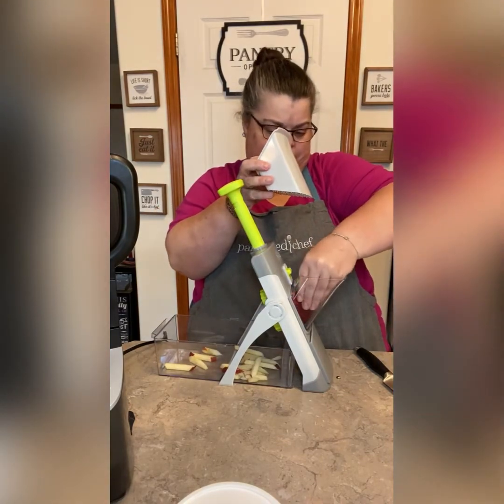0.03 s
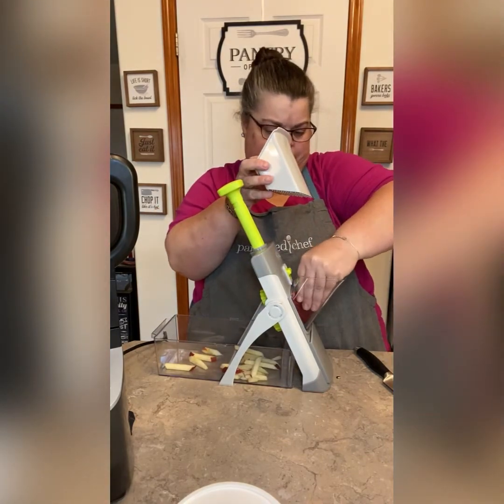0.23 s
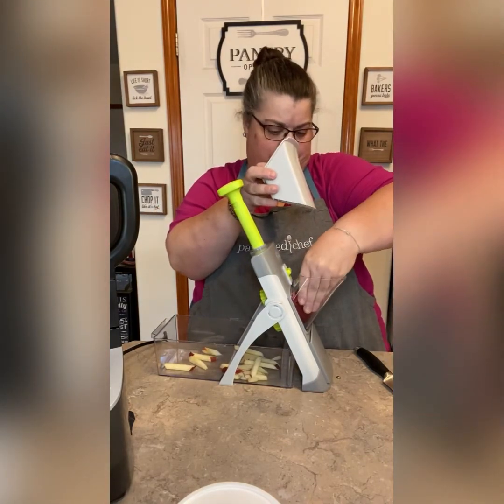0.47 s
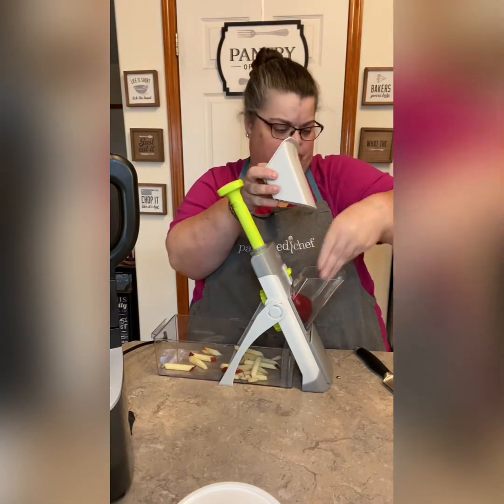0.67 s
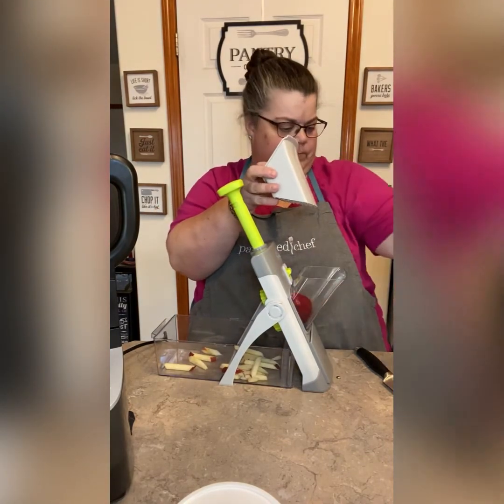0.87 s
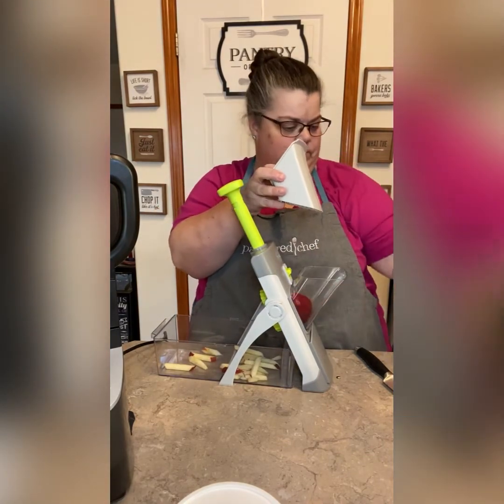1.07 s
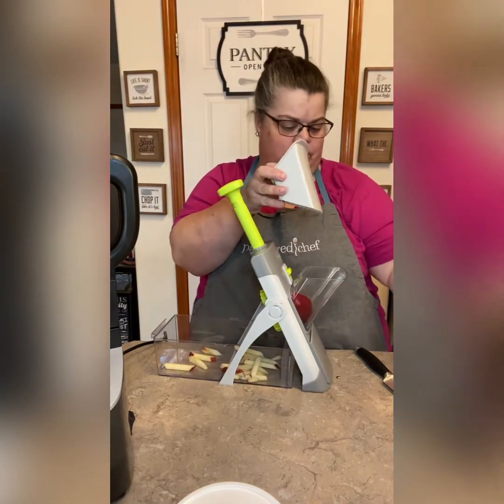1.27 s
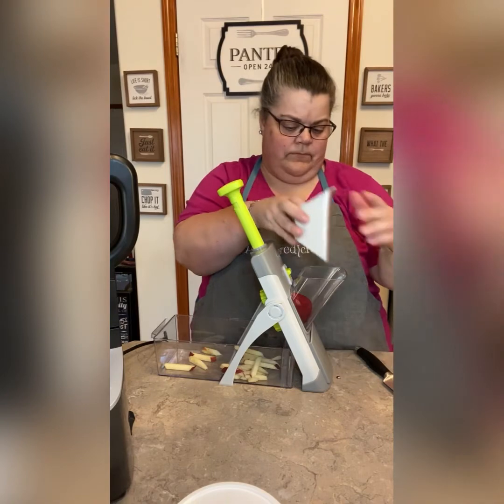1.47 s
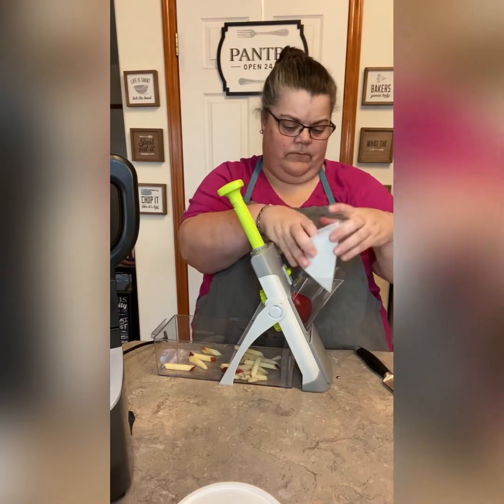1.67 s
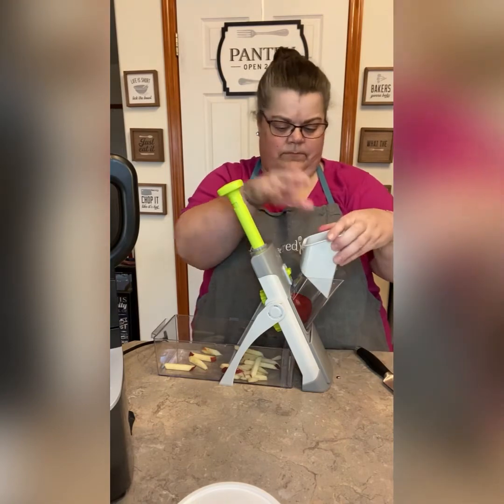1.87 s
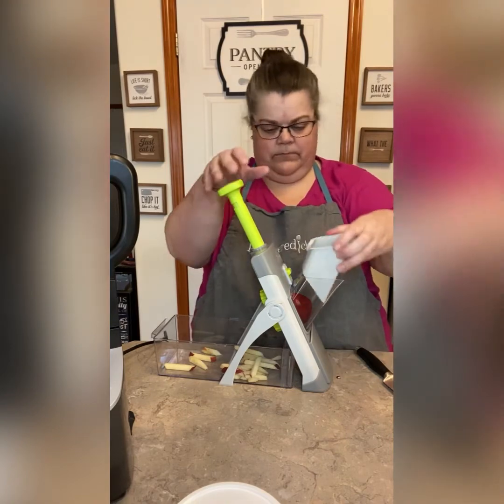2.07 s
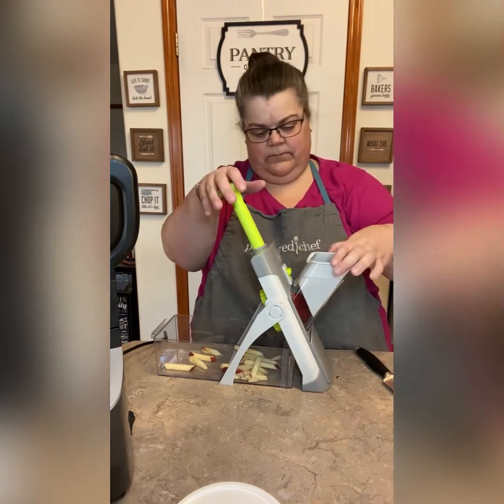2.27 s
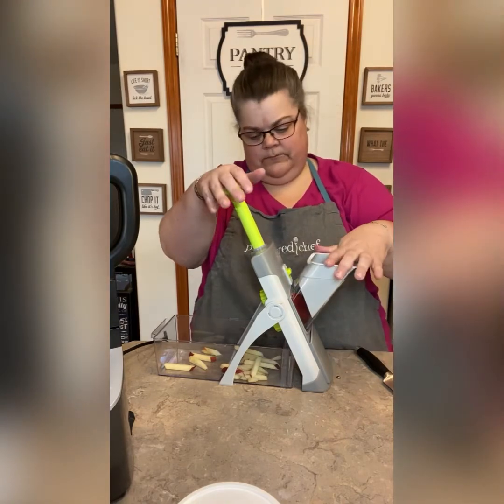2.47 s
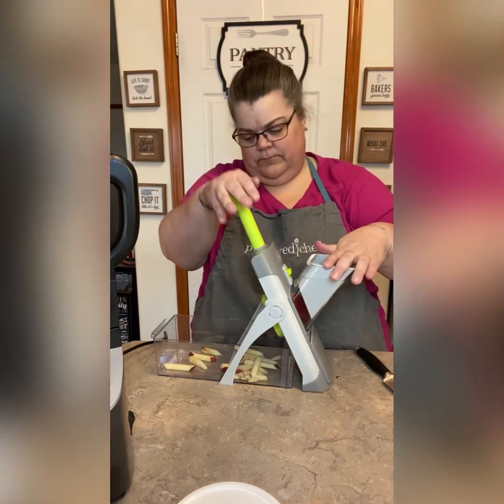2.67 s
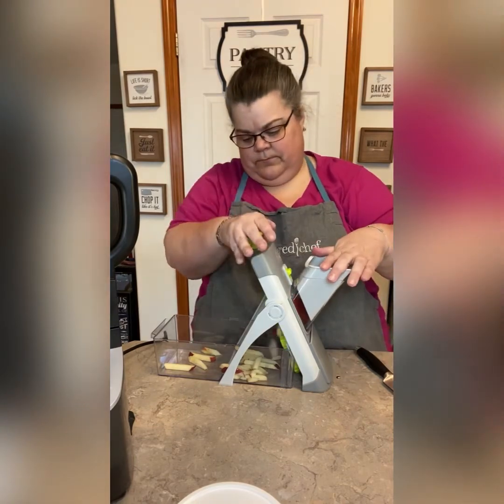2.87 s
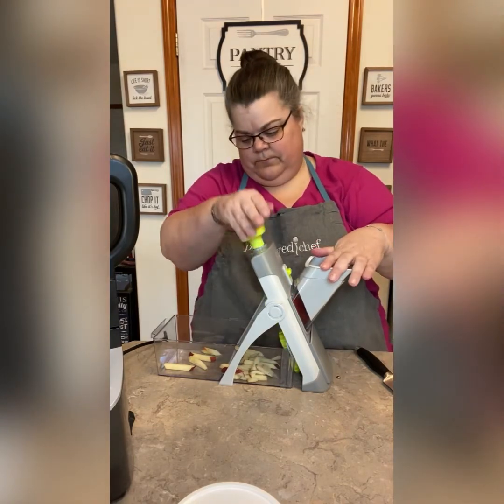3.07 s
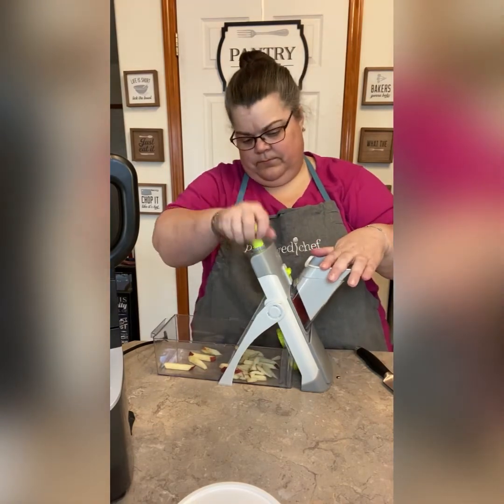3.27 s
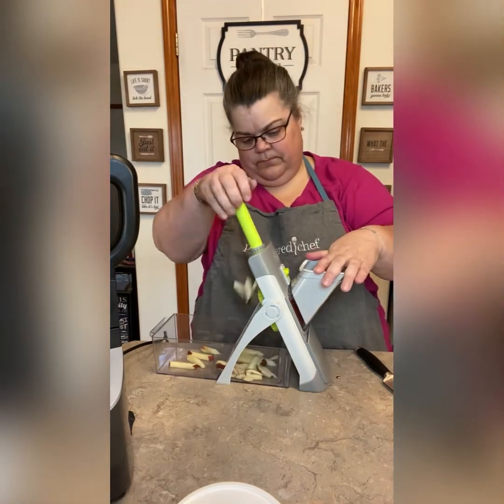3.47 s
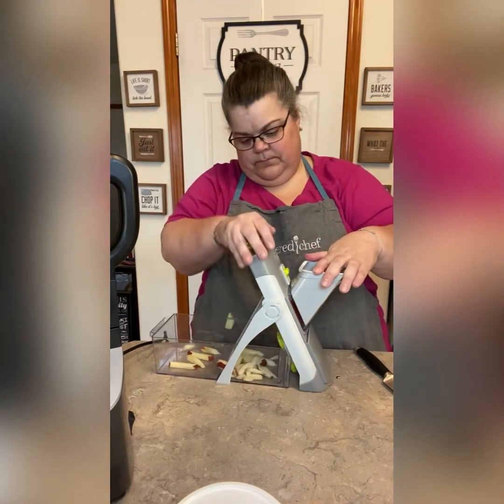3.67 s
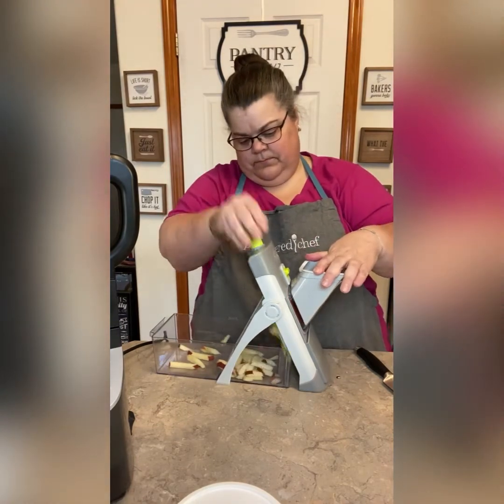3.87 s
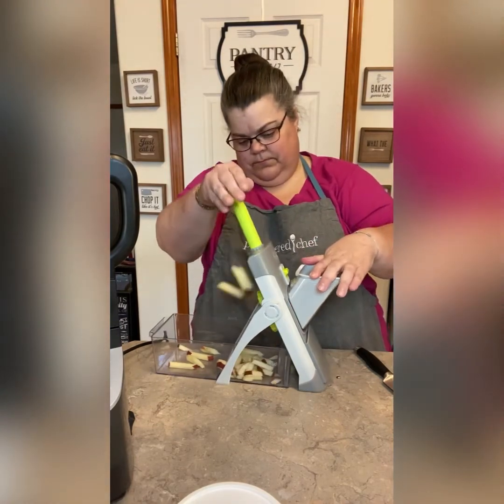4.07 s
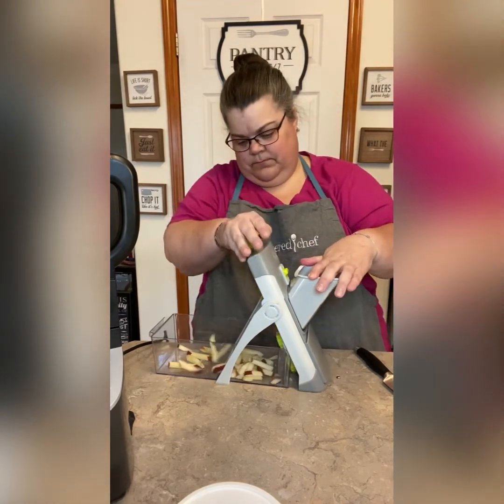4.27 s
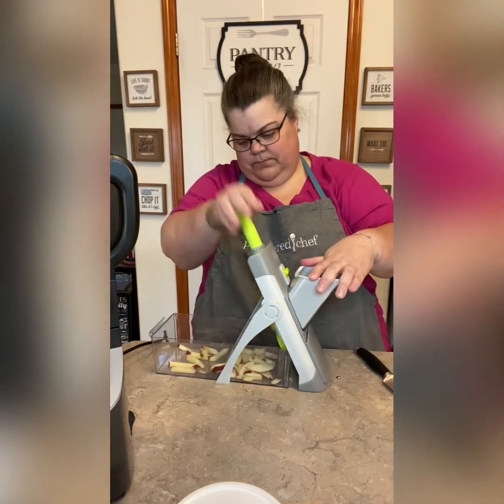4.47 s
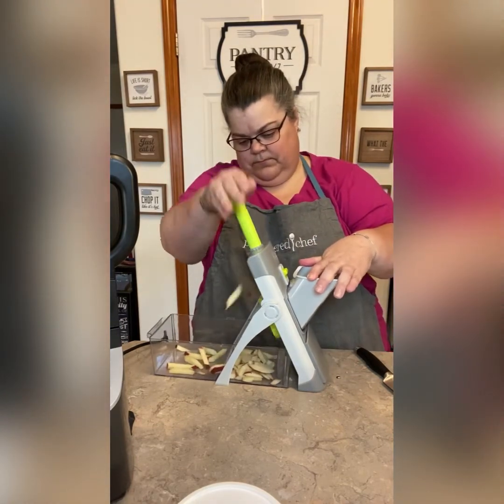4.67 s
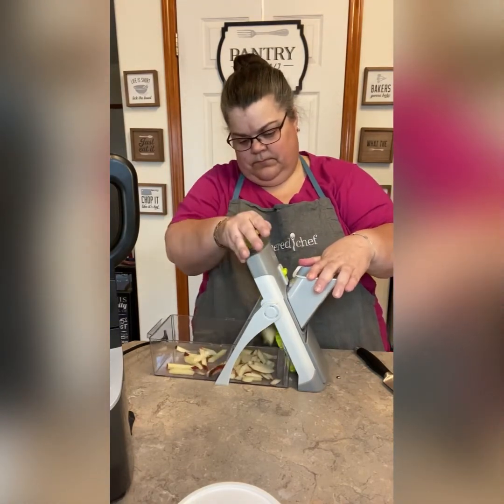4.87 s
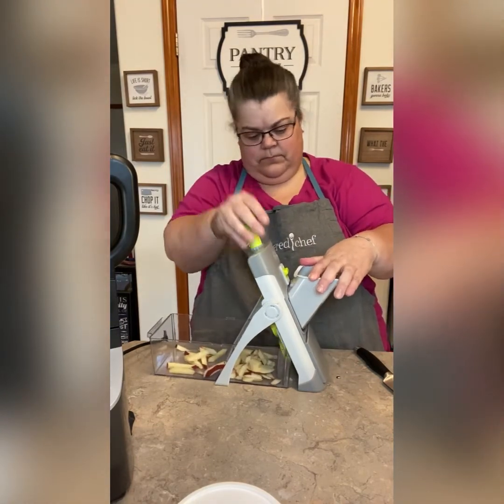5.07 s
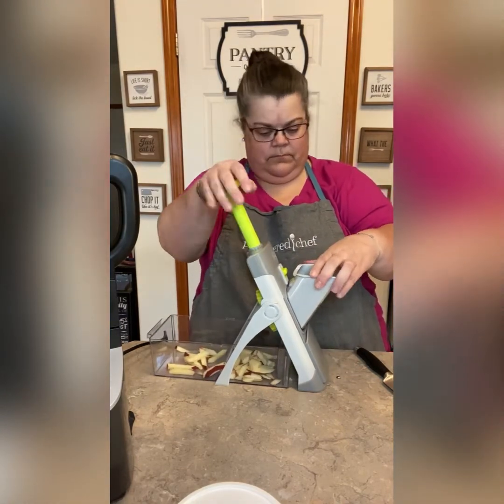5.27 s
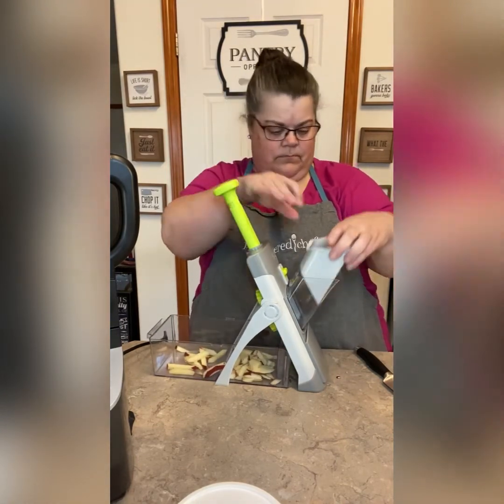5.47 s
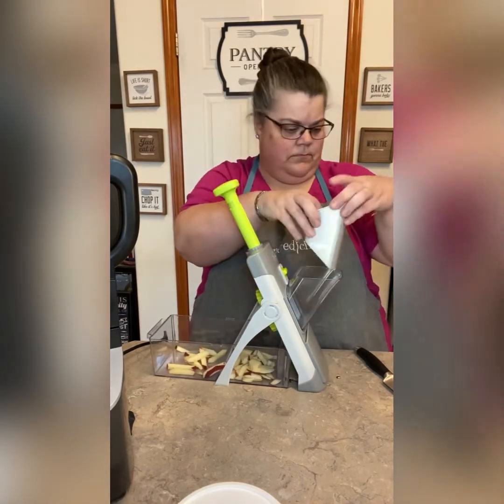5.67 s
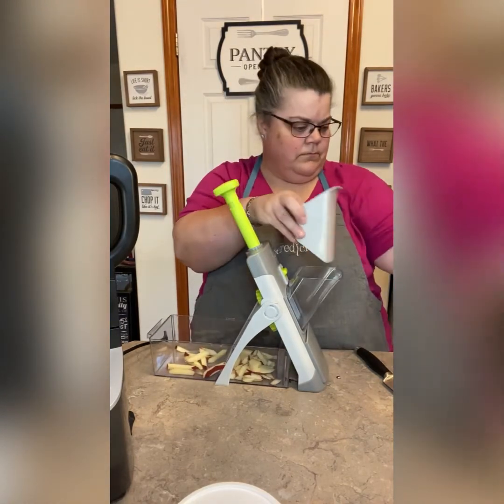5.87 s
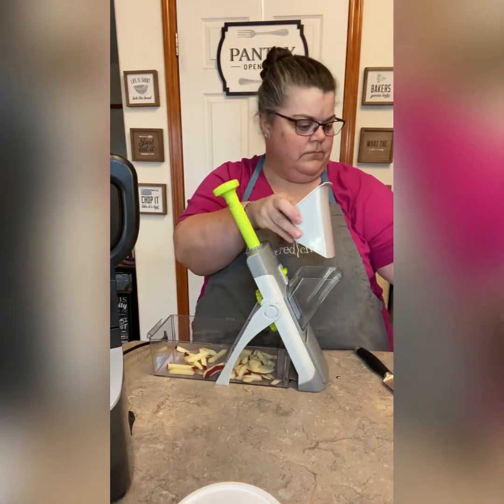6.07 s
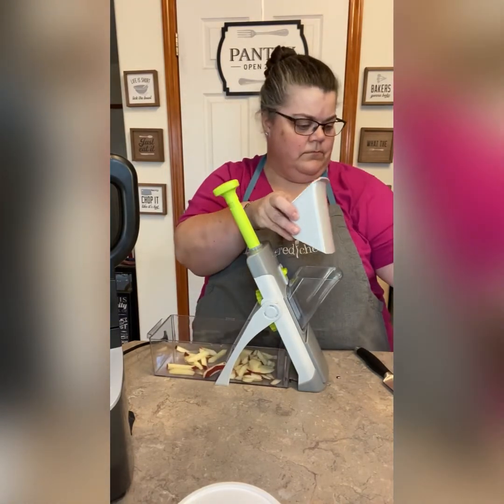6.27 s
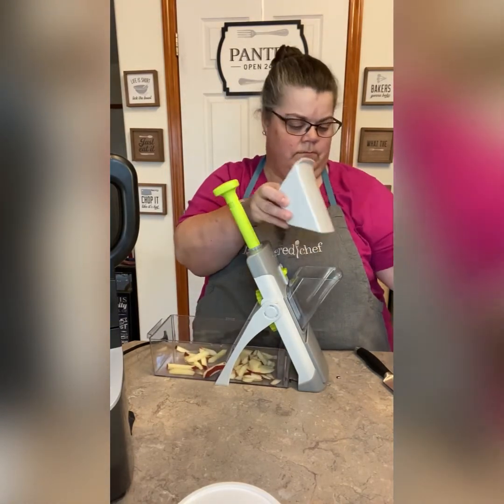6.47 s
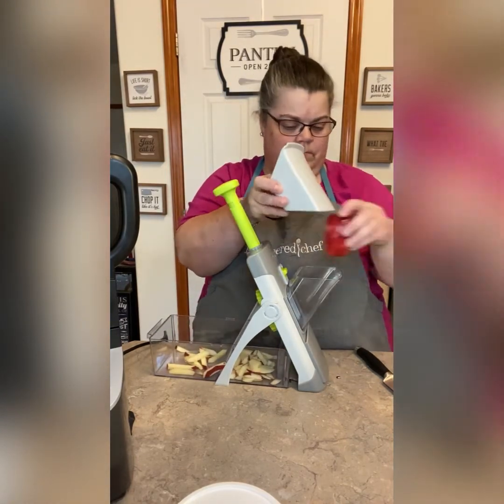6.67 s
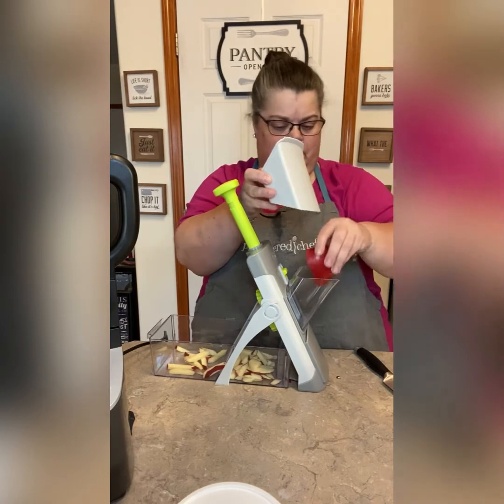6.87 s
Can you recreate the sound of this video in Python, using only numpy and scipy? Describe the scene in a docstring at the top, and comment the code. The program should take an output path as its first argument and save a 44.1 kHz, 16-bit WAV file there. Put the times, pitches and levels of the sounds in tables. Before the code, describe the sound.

A quiet small kitchen: a low, slightly wavering fridge hum and soft rumble, with only very faint plastic ticks and rubs in the first 1.5 s. At 1.5-1.7 s a thin hollow pusher knocks the slicer and soft bumps reach the counter. Around 2.0-2.4 s it clatters and scrapes into the chute, loudest near 2.1 s. Then four strokes: short, wet, gritty scrapes swelling into hard plastic knocks with deep counter thuds at about 2.8, 3.65, 4.25 and 4.75 s. Each is answered by a zipping spring return and bright double-edged slam near 3.35, 3.95, 4.5 and 5.15 s, with a brief hollow resonance after most. Slices and loose parts tap and rattle between. From 5.3 to 5.9 s lighter knocks and scrapes as the pusher comes off; then near quiet, faint bumps around 6.2-6.5 s and a tiny hollow rub at 6.7 s. Close stereo, short diffuse room.

```python
"""A fridge hums in a small, quiet kitchen while hands shift a hard plastic plunger slicer on the counter.
A hand-held pusher then knocks its chute; rubs, and later slams, sound its air cavity as a narrow noise band.
Four times the blade scrapes wetly through an apple, stops with a thud, and a spring slams it back up.
Between and after the strokes, loose slices, edges and pusher rattle. Noisy contacts ring plastic modes,
thuds bounce and ring the counter, and a diffuse room answers; two microphone ports hear it all."""
import sys
import numpy as np
from scipy import signal
from scipy.fft import rfft, irfft, next_fast_len
from scipy.io import wavfile
from scipy.ndimage import uniform_filter1d, map_coordinates

SR = 44100
rng = np.random.default_rng(int(sys.argv[2]) if len(sys.argv) > 2 else 0)


def to_wav(s):
    """Save 16-bit WAV."""
    ch = np.atleast_2d(s).T  # columns
    pcm = np.round(np.clip(ch, -1, 1) * 32767)  # PCM
    wavfile.write(sys.argv[1], SR, pcm.astype(np.int16))


N = 305172  # length in samples
LEFT_RIGHT = np.array([[1], [-1]])  # sign of a side signal in each channel


def undb(db):
    """Turn dB into gain."""
    return 10 ** (np.asarray(db) / 20)


def unit(x):
    """Scale to rms 1."""
    return x / np.sqrt(np.mean(x ** 2))


def over(table, hz):
    """Read a (frequency, value) table on a log-frequency axis."""
    f, v = np.transpose(table)
    return np.interp(np.log(hz + 1), np.log(f + 1), v)


def shape(x, gain_at):
    """Filter by a gain given as a function of frequency."""
    size = next_fast_len(x.shape[-1])
    hz = np.arange(size // 2 + 1) * SR / size
    return irfft(rfft(x, size) * gain_at(hz), size)[..., :x.shape[-1]]


def add(track, s, sound):
    """Mix a sound in at time s."""
    i = int(s * SR)
    track[i:i + len(sound)] += sound[:N - i]


def walk(rate):
    """Random levels held 1 / rate s and slewed twice; spread near 1."""
    k = int(SR / rate)
    steps = np.repeat(rng.standard_normal(N // k + 1), k)
    return 0.91 * uniform_filter1d(uniform_filter1d(steps, k), k)[:N]


def ring(modes, size, scatter_db):
    """Damped sines that swell over about a cycle; each call scatters their strength and pitch."""
    hz, db, t60 = np.transpose(modes)[:, :, None]
    strength, detune = rng.standard_normal((2, len(modes), 1))
    t = np.arange(size) / SR
    pitch = hz * (1 + .035 * detune)
    decay = undb(db + scatter_db * strength - 60 * t / t60)
    swell = 1 - np.exp(-2 * pitch * t)
    return decay * swell * np.sin(2 * np.pi * pitch * t)


# spectrum of the soft rumble and air: f/Hz, relative level/dB
RUMBLE_SHAPE = [(20, -10), (50, -5), (86, -8.5), (120, -12.5), (177, -22.5), (250, -19), (330, -30),
                (500, -39), (800, -47.5), (1500, -55), (2300, -51), (3300, -62.5), (5000, -64.5),
                (8000, -67), (16000, -78)]
# fridge tones: f/Hz, mean rms level/dB
FRIDGE_TONES = [(60, -68), (119, -61), (168, -59), (241, -70.5)]
RUMBLE_DB = -51


def kitchen():
    """Fridge tones waver over a soft rumble whose left and right differ mainly in the treble."""
    t = np.arange(N) / SR
    mid, side = shape(rng.standard_normal((2, N)), lambda hz: undb(over(RUMBLE_SHAPE, hz)))
    side = shape(side, lambda hz: .5 * hz / (hz + 1500))
    rumble = unit(mid + side * LEFT_RIGHT) * undb(RUMBLE_DB + 1.2 * walk(4))
    hum = np.zeros(N)
    for hz, db in FRIDGE_TONES:
        level = np.sqrt(2) * undb(db + 2.5 * walk(12))
        hum += level * np.sin(2 * np.pi * hz * t + 1.5 * walk(12))
    return rumble + hum


# nominal modes of the plastic frame: f/Hz, level/dB, t60/s
FRAME_MODES = [(357, -29.5, 0.0079), (507, -14, 0.017), (595.5, -2.5, 0.013), (760, 5, 0.0074),
               (814, 1, 0.014), (1006.4, -10.5, 0.035), (1128, -2, 0.013), (1244, 3.5, 0.0053),
               (1730, -12, 0.008), (2060, -2, 0.014), (2350, -2, 0.012), (2690, -6, 0.01),
               (3030, -12, 0.006), (3300, -15, 0.006), (3800, 4, 0.0019), (5120, -4.5, 0.0016),
               (5800, -8.5, 0.0029), (6050, 7, 0.00059), (7940, -3.5, 0.0012), (10750, -16, 0.0043),
               (12900, -7, 0.0001)]
# nominal modes of the counter top: f/Hz, level/dB, t60/s
COUNTER_MODES = [(60, -24.5, 0.69), (86.4, -17, 0.2), (111, -21, 0.3), (144.1, -21.5, 0.037),
                 (198.4, -11.5, 0.15), (251, -12.5, 0.085), (338.8, -15.5, 0.14)]
SCRAPE_FLICKER_DB, SCRAPE_RING = 5, 1.2  # spread of each mode's level; factor on the frame's t60
SCRAPE_WANDER = .07  # spread of the pitch, as a share of it


def grains(rate, spread_db):
    """Sparse random clicks, rate per second, a few of them much stronger."""
    hits = rng.random(N) < rate / SR
    return hits * rng.standard_normal(N) * undb(spread_db * rng.exponential(size=N))


def scrape_layers():
    """Stick-slip clicks ring frame and counter; bursting apple cells crackle as a hiss."""
    clicks = grains(3000, 2.2) * undb(2.5 * walk(50))
    modes = ring(np.array(FRAME_MODES) * [1, 1, SCRAPE_RING], size=4096, scatter_db=1)
    part = np.digitize(np.array(FRAME_MODES)[:, 0], [1500, 5200])  # Hz; the top part stays silent
    # the contact travels, so the rings wander in pitch
    place = np.cumsum(1 + SCRAPE_WANDER * walk(9))
    layers = []
    for k in range(2):  # hollow, mid
        layer = np.zeros(N)
        for mode in modes[part == k]:
            flickering = clicks * undb(SCRAPE_FLICKER_DB * walk(30))
            layer += signal.fftconvolve(flickering, mode)[:N]
        layers.append(map_coordinates(unit(layer), [place], order=1, mode="mirror"))
    cells = grains(9000, 2)
    hiss = unit(shape(cells, lambda hz: (hz / 6000) / (1 + (hz / 6000) ** 3.16))) * undb(2 * walk(41))
    counter = ring(COUNTER_MODES, size=8192, scatter_db=4.5).sum(0)
    shake = unit(signal.fftconvolve(clicks, counter)[:N])
    return layers + [hiss, shake]


SLIDE_FADE_S = 0.015


def slide(layers, moments, levels_db):
    """One slide: each scrape layer follows its own level through three moments."""
    t = np.arange(N) / SR
    nearest_edge = np.minimum(t - moments[0], moments[-1] + SLIDE_FADE_S - t)
    moving = np.clip(nearest_edge / SLIDE_FADE_S, 0, 1)
    return sum(moving * undb(np.interp(t, moments, db)) * layer for layer, db in zip(layers, levels_db))


# hands slide pusher and plunger about: start t/s, loudest t/s, end t/s,
# hollow scrape level/dB, mid and hiss level/dB against the hollow scrape
HAND_SHIFTS = [(-0.1, 0, 0.44, -83, 6, 6), (0.097, 0.196, 0.25, -74.5, -2.5, 2),
               (0.214, 0.265, 0.46, -79.5, 19, 17.5), (1.925, 2.008, 2.19, -56.5, -0.5, -22),
               (2.008, 2.116, 2.31, -46, -2.5, -10.5), (2.363, 2.438, 2.53, -61.5, -4, -7),
               (2.51, 2.66, 4.2, -49.5, -5, -11), (5.3, 5.39, 5.46, -55.5, -6, -4),
               (5.47, 5.53, 5.6, -58, -8, -13), (5.54, 5.597, 5.623, -49, 1, -16.5),
               (5.602, 5.652, 5.74, -55.5, 2, 0), (5.813, 5.844, 5.93, -56, -13, -37),
               (6.147, 6.32, 6.32, -87.5, 17.5, 5), (6.666, 6.75, 6.8, -72, -1, 8.5)]
SHIFT_RISE_DB, SHIFT_FALL_DB = 24.5, 23.5
SHIFT_SHAKE_DB = -10.5  # counter shake against the hollow scrape


def hand_shifts(layers):
    """Slides by hand swell to their loudest moment and sink again."""
    swell = np.array([-SHIFT_RISE_DB, 0, -SHIFT_FALL_DB])
    out = np.zeros(N)
    for start, loudest, end, hollow_db, mid_db, hiss_db in HAND_SHIFTS:
        balance = np.array([[0], [mid_db], [hiss_db], [SHIFT_SHAKE_DB]])
        out += slide(layers, [start, loudest, end], hollow_db + swell + balance)
    return out


PART_HZ = [1500, 3700, 7000]  # borders of the low, middle, high and highest modes
CHATTER_T60_S, CHATTER_FLUTTER_DB = 0.23, 4  # loose parts rattle in fits


def blows(table, contact_s, top_db, body):
    """A short rattling contact rings the body, then loose parts chatter, each mode in its own fits."""
    out, t = np.zeros(N), np.arange(16384) / SR
    parts = np.digitize(np.array(body)[:, 0], PART_HZ)
    contact = (t / contact_s) ** 0.35 * np.exp(-(t / contact_s) ** 1.28)
    for s, db, clack_db, crack_db, chatter_db in table:
        spikes_db = 2.85 * rng.exponential(size=len(t))
        chatter = undb(chatter_db - 60 * t / CHATTER_T60_S + spikes_db) * np.clip(t / 0.0046, 0, 1)
        fits = np.repeat(rng.standard_normal((len(body), 32)), 512, axis=1)
        chatter = chatter * undb(CHATTER_FLUTTER_DB * uniform_filter1d(fits, size=512))
        rattle = rng.standard_normal(len(t)) * (contact + chatter)
        modes = signal.fftconvolve(rattle, ring(body, size=3072, scatter_db=5), axes=1)
        # low ring, mid clack, bright crack and the highest modes
        gains = undb(db + np.array([0, clack_db, crack_db, crack_db + top_db]))
        for k, gain in enumerate(gains):
            part = modes[parts == k].sum(0)
            add(out, s, gain * part / np.abs(part).max())
    return out


# hard edges tick past each other: t/s, ring peak level/dB, bright crack level/dB against the ring
EDGE_TICKS = [(0.065, -76, 35.5), (0.265, -69, 36.5), (0.283, -78, 44), (0.295, -70, 28),
              (2.199, -26.5, -11.5), (2.997, -54, -3), (3.18, -44, -2.5), (3.307, -30, 5.5),
              (3.328, -28, 11), (3.401, -12, -12.5), (3.826, -49, 3.5), (3.895, -32, -9.5),
              (3.917, -13, -14), (3.96, -18.5, -2), (3.974, -30, -3), (4.217, -28.5, -18),
              (4.545, -28.5, -4), (4.701, -30, -26), (5.011, -54, -6), (5.449, -33.5, -30),
              (6.144, -80, 13.5), (6.255, -80, 15), (6.284, -77.5, 12), (6.322, -70.5, 14.5),
              (6.686, -80, 19)]
TICK_CONTACT_S, EDGE_TOP_DB = 0.0016, -4  # top dB: the highest modes against the crack
CLACK_SHARE, EDGE_CLACK_DB, EDGE_CHATTER_DB = 0.42, 1.5, -29  # clack takes this share of the crack's dB


def edge_ticks():
    """Very short contacts tick the frame; the brighter a tick, the more mid clack it has too."""
    ticks = [(s, db, EDGE_CLACK_DB + CLACK_SHARE * crack, crack, EDGE_CHATTER_DB)
             for s, db, crack in EDGE_TICKS]
    return blows(ticks, TICK_CONTACT_S, EDGE_TOP_DB, FRAME_MODES)


# nominal modes of the thin hollow pusher: f/Hz, level/dB, t60/s
PUSHER_MODES = [(340, -8, .025), (470, -6, .02), (630, -3, .02), (780, 0, .017), (960, -1, .017),
                (1210, -2, .016), (1450, -4, .008), (1700, -2, .009), (2060, -3, .009), (2310, -3, .011),
                (2520, -2, .011), (2780, -3, .01), (3150, -5, .008), (3900, -2, .006), (4900, -2, .004),
                (6450, 6, .001), (8100, -8, .003), (10670, -10, .003), (12900, -5, .0003)]
# the pusher knocks against the chute: t/s, ring peak level/dB,
# mid clack, bright crack and chatter level/dB against the ring
PUSHER_KNOCKS = [(1.511, -23, -6, -10, -7), (1.663, -22.5, 1.5, -5.5, -13.5),
                 (1.689, -24.5, -5.5, -14, -25), (1.977, -31.5, -12, -23, -25),
                 (2.122, -15, -1, -4.5, -22.5), (2.14, -39, -12, -19, -25), (2.155, -34.5, 8, -18, -15),
                 (2.168, -39, -2, -18, -25), (2.18, -44, -12, -32, -27), (2.214, -37.5, -4, -25, -16),
                 (2.233, -29, -22, -45, -38), (2.342, -26, -7, -17.5, -13), (2.398, -57, -8, -3, 4),
                 (5.328, -46.5, -5, -9, -14), (5.402, -43.5, -7, -16, -6), (5.466, -27, -2, -7.5, -18),
                 (5.495, -41, 2, -21, -18), (5.51, -37, -15, -19, -24), (5.548, -40, -4, -6, -1),
                 (5.579, -46, 2, -17, -17), (5.6, -40, -0.5, -9.5, -9), (5.633, -51.5, -16, -12, -10),
                 (6.407, -53, -22, -46, -22), (6.902, -61, -2, -6, -7)]
PUSHER_CONTACT_S = 0.0043
TAP_TOP_DB = -18  # the highest modes against the crack


def pusher_knocks():
    """The chute strikes the thin pusher, which rings in its own modes."""
    return blows(PUSHER_KNOCKS, PUSHER_CONTACT_S, TAP_TOP_DB, PUSHER_MODES)


BOUNCE_TO_HZ, BOUNCE_GLIDE_S, BOUNCE_HOLD_S = 92.4, 0.0059, 0.024


def thuds(table, from_hz, push_s=0.0016):
    """Squashed rubber feet bounce a few cycles, falling in pitch; a push rings the counter's tail."""
    out, t = np.zeros(N), np.arange(16384) / SR
    glide = (from_hz - BOUNCE_TO_HZ) * BOUNCE_GLIDE_S * (1 - np.exp(-t / BOUNCE_GLIDE_S))
    turns = BOUNCE_TO_HZ * t + glide
    squash = np.clip(t / .005, 0, 1) * np.exp(-(t / BOUNCE_HOLD_S) ** 4)
    bounce = np.sin(2 * np.pi * turns) * squash
    push = np.hanning(int(push_s * SR))
    for s, db in table:
        counter = ring(COUNTER_MODES, size=len(t), scatter_db=1).sum(0)
        boom = bounce + np.convolve(push / push.sum(), counter)[:len(t)]
        add(out, s, -undb(db) * boom / np.abs(boom).max())
    return out


# soft bumps through the feet into the counter: t/s, peak level/dB
SOFT_BUMPS = [(1.522, -33.5), (1.664, -39), (2.14, -32.5), (2.228, -27.5), (2.425, -43.5), (2.677, -24.5),
              (3.188, -35), (3.269, -26), (6.205, -41), (6.407, -33), (6.439, -40), (6.471, -42)]


def soft_bumps():
    """Soft bumps start their bounce low."""
    return thuds(SOFT_BUMPS, from_hz=120)


# rubs of the pusher and ringing of its cavity after slams, one list each: t/s, level/dB, f/Hz
CAVITY_SOUNDS = [
    [(1.69, -38, 850), (1.72, -42.5, 930), (1.765, -51, 1000), (1.8, -68, 900), (1.9, -60.5, 816)],
    [(2.135, -30, 850), (2.165, -37, 977), (2.195, -40, 950), (2.215, -37.5, 749), (2.24, -38.5, 837),
     (2.27, -62, 802), (2.32, -58, 784)],
    [(3.565, -45, 700), (3.59, -37, 760), (3.625, -44.5, 760)],
    [(3.94, -28, 783), (4.0, -37.5, 780), (4.12, -56, 779)],
    [(4.525, -24, 792), (4.6, -42, 776), (4.72, -52, 760)],
    [(5.11, -37.5, 757), (5.125, -58, 751), (5.18, -38, 820), (5.27, -51.5, 800), (5.4, -68, 814)],
    [(5.475, -41, 879.5), (5.525, -60, 853), (5.56, -60, 912), (5.62, -52.5, 828), (5.69, -68, 793)],
    [(6.676, -78, 862), (6.695, -59.5, 876), (6.706, -74, 866), (6.72, -59, 850), (6.733, -70, 865),
     (6.75, -54, 870), (6.768, -75, 868), (6.79, -77, 856), (6.84, -83, 866)],
]
CAVITY_WIDTH_HZ = 140


def pusher_cavity():
    """Noise through the air cavity: a narrow band around a moving pitch."""
    t, out = np.arange(N) / SR, np.zeros(N)
    slow = shape(rng.standard_normal((2, N)), lambda f: 1 / (1 + (2 * f / CAVITY_WIDTH_HZ) ** 2))
    for table in CAVITY_SOUNDS:
        s, db, hz = np.transpose(table)
        phase = 2 * np.pi * np.cumsum(np.interp(t, s, hz)) / SR
        band = unit(slow[0] * np.cos(phase) + slow[1] * np.sin(phase))
        out += band * np.interp(t, s, undb(db), 0, 0)
    return out


STROKE_SHAKE_DB = 2  # counter shake against the hollow scrape


def strokes(layers, table, course_db):
    """Plunger strokes: every scrape layer follows its own level at start, halfway and end."""
    shake_db = np.add(course_db[0], STROKE_SHAKE_DB)
    balance = np.array(list(course_db) + [shake_db])
    out = np.zeros(N)
    for start, end, db in table:
        out += slide(layers, [start, (start + end) / 2, end], db + balance)
    return out


# the hand pushes the blade through the apple: start t/s, end t/s, scrape level/dB
BLADE_CUTS = [(2.665, 2.802, -41.5), (3.548, 3.655, -37), (4.14, 4.245, -38.5), (4.67, 4.756, -41.5)]
# rows hollow scrape, mid scrape, wet hiss; columns level/dB at start, halfway, end, against the scrape
CUT_COURSE = [(-1.5, -3, 1.7), (-3.5, -4, 2.8), (-15.5, -11, 0.58)]


def blade_cuts(layers):
    """Stick-slip down the stroke, every layer loudest at the end; the wet hiss grows most."""
    return strokes(layers, BLADE_CUTS, CUT_COURSE)


# apple and loose slices knock the frame: t/s, ring peak level/dB,
# mid clack, bright crack and chatter level/dB against the ring
APPLE_TAPS = [(2.672, -28, -10.5, -23.5, -12), (2.893, -19, -11, -26, -25.5),
              (3.052, -26.5, -12, -22, -28.5), (3.188, -22.5, -15.5, -27, -12),
              (3.255, -30.5, -9, -27, -6.5), (3.272, -21, -14, -25.5, -21), (3.552, -29, -6.5, -15.5, -17),
              (3.586, -24, -11.5, -20, -20.5), (3.837, -35, -1.5, -13, -14.5),
              (4.143, -34.5, -10, -17.5, -19.5), (4.379, -24, -29, -46.5, -27),
              (4.395, -25.5, -19, -33, -25), (4.422, -29, -8.5, -14.5, -15),
              (4.467, -14, -12, -20.5, -30.5), (5.004, -25.5, -8, -11.5, -13), (5.049, -34, -6.5, -18, 2),
              (5.12, -29.5, -16.5, -28, -40.5)]
KNOCK_CONTACT_S = 0.0041


def apple_taps():
    """Apple and slices strike the frame, with little of its highest modes."""
    return blows(APPLE_TAPS, KNOCK_CONTACT_S, TAP_TOP_DB, FRAME_MODES)


STOP_FROM_HZ, STOP_TOP_DB = 275, -13  # hard stops bounce from high; highest modes against the crack
THUD_LAG_S = .003


def stop_thuds(table):
    """The thud that follows each stop a moment later through the counter."""
    return thuds([(s + THUD_LAG_S, thud) for s, _, thud, _ in table], STOP_FROM_HZ)


# plunger hits the bottom stop: t/s, ring peak level/dB, counter thud level/dB,
# mid clack level/dB against the ring
BOTTOM_STOPS = [(2.808, -1.5, 3.5, -6.5), (3.661, -5, 2.5, -7), (4.251, -9, 0.5, -7.5),
                (4.763, -6.5, 1, -6.5)]
BOTTOM_CRACK_DB, BOTTOM_CHATTER_DB = -16.5, -21  # against the ring


def bottom_stops():
    """The plunger rings the frame and thuds hard on the counter; returns knocks and thuds."""
    hits = [(s, db, clack, BOTTOM_CRACK_DB, BOTTOM_CHATTER_DB) for s, db, _, clack in BOTTOM_STOPS]
    return blows(hits, KNOCK_CONTACT_S, STOP_TOP_DB, FRAME_MODES), stop_thuds(BOTTOM_STOPS)


# the spring pulls the carriage back: start t/s, end t/s, scrape level/dB
SPRING_RETURNS = [(3.255, 3.342, -32.5), (3.825, 3.93, -34), (4.4, 4.511, -38), (5.03, 5.163, -47.5)]
# rows hollow scrape, mid scrape, hiss; columns level/dB at start, halfway, end, against the scrape
RETURN_COURSE = [(-10.5, -8.5, 4.5), (-22.5, -8.5, 2), (-28, -15.5, -18)]


def spring_returns(layers):
    """Stick-slip up the stroke: hollow and mid scrape are loudest at the end, the hiss halfway."""
    return strokes(layers, SPRING_RETURNS, RETURN_COURSE)


# the spring slams the carriage against the top stop: t/s, ring peak level/dB, counter thud level/dB,
# mid clack level/dB against the ring
TOP_STOPS = [(3.347, -2, -10, -1.5), (3.936, -4.5, -12, 4), (4.517, -3, -11, -1.5), (5.17, -7.5, -19, -1)]
TOP_CRACK_DB, TOP_CHATTER_DB = -5.5, -22  # against the ring
REBOUND_S, REBOUND_DB = .006, -9


def top_stops():
    """A bright slam and one bounce of the carriage, with a weaker thud; returns knocks and thuds."""
    hits = []
    for s, db, _, clack in TOP_STOPS:
        hits.append((s, db, clack, TOP_CRACK_DB, TOP_CHATTER_DB))
        hits.append((s + REBOUND_S, db + REBOUND_DB, clack, TOP_CRACK_DB, TOP_CHATTER_DB))
    return blows(hits, KNOCK_CONTACT_S, STOP_TOP_DB, FRAME_MODES), stop_thuds(TOP_STOPS)


# bands of the diffuse tail: centre f/Hz, t60/s, level/dB
ROOM_BANDS = [(153, 0.4, -7.5), (497, 0.41, -6), (1670, 0.39, -6), (3900, 0.4, -6), (9740, 0.51, -19)]


def room(x):
    """Diffuse noise tail, decaying band by band, less alike at the two ports as pitch rises."""
    t = np.arange(int(.6 * SR)) / SR
    tail = np.zeros((2, len(t)))
    for hz, t60, db in ROOM_BANDS:
        noise = rng.standard_normal((3, len(t)))
        both, left, right = shape(noise, lambda f: np.exp(-np.log2((f + 1) / hz) ** 2))
        unlike = np.clip((hz - 100) / 450, 0, .95)
        ports = np.sqrt(1 - unlike ** 2) * both + unlike * np.array([left, right])
        fade = undb(-60 * t / t60) * np.clip(t / 0.0025, 0, 1)
        tail += undb(db) * ports * fade / np.sqrt(np.sum(fade ** 2))
    return signal.fftconvolve(x[None], tail, axes=1)[:, :N]


# level between the two ports: f/Hz, left minus right level/dB
PORT_BALANCE = [(100, .4), (300, 2.8), (600, 3.4), (1200, 1.2), (2500, 1), (5000, -.3)]
# phase between the two ports: f/Hz, lead of the left [rad]
PORT_PHASE = [(200, 0), (430, -.2), (780, -.9), (1290, -.4), (2500, -1), (3880, -.2), (7500, -.5),
              (9600, -1.2), (12200, -2.9), (16000, -3.1)]


def ports(x):
    """Two microphone ports hear from unlike angles: level and phase differ with frequency."""
    def port_gain(hz):
        level = undb(LEFT_RIGHT * over(PORT_BALANCE, hz) / 2)
        return level * np.exp(.5j * LEFT_RIGHT * over(PORT_PHASE, hz))
    return shape(x, port_gain)


THUD_ROOM_DB = -1  # thuds stir the room a little less


def scene():
    """All contacts sound directly and through the room, over the kitchen's hum."""
    background = kitchen()
    layers = scrape_layers()
    work = hand_shifts(layers) + edge_ticks() + pusher_knocks() + pusher_cavity()
    work += blade_cuts(layers) + apple_taps() + spring_returns(layers)
    bottom_knocks, bottom_thuds = bottom_stops()
    top_knocks, top_thuds = top_stops()
    work += bottom_knocks + top_knocks
    feet = soft_bumps() + bottom_thuds + top_thuds
    return ports(work + feet + room(work + undb(THUD_ROOM_DB) * feet) + background)


# colour of the microphone: f/Hz, level/dB
MICROPHONE_COLOUR = [(100, -5), (9000, 3), (13100, 9), (14000, -8), (16000, -30)]
BASS_CUT_HZ, TOP_HZ = 60, 16100


def record(dry):
    """The microphone cuts deep bass, colours the treble, rounds loud peaks and ends at a steep top."""
    bass_cut = signal.butter(3, BASS_CUT_HZ, "high", fs=SR, output="sos")
    dry = signal.sosfilt(bass_cut, dry)
    coloured = shape(dry, lambda hz: undb(over(MICROPHONE_COLOUR, hz)))
    heard = np.tanh(1.077 * coloured) / 1.025
    top_cut = signal.ellip(8, .2, 70, TOP_HZ, fs=SR, output="sos")
    return signal.sosfilt(top_cut, heard)


dry = scene()
out = record(dry)
to_wav(out)
```